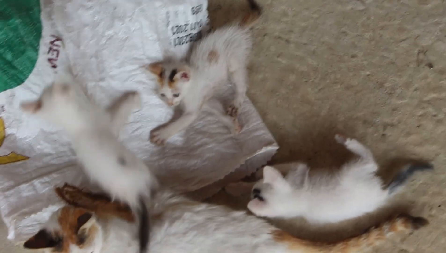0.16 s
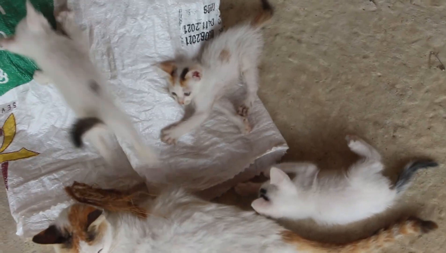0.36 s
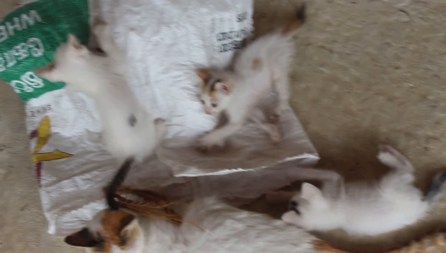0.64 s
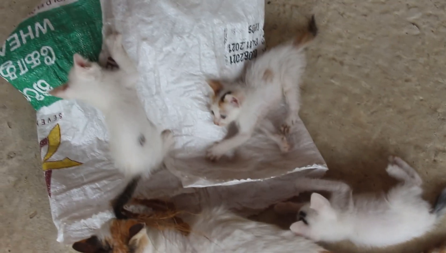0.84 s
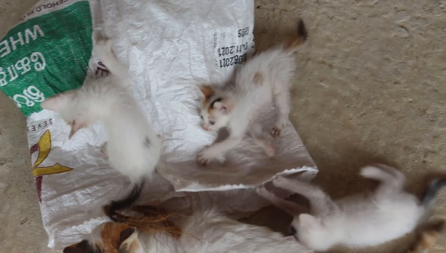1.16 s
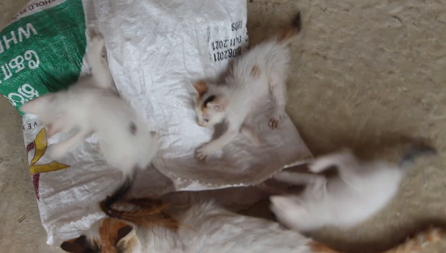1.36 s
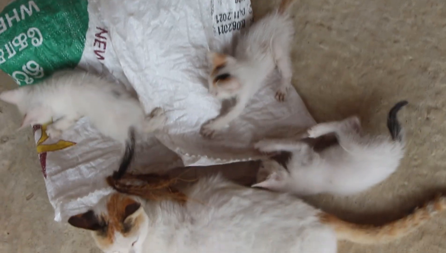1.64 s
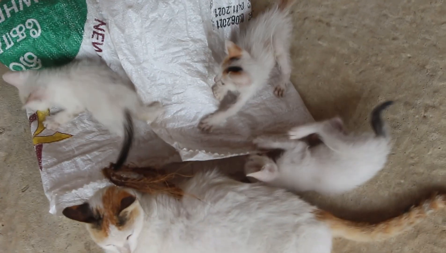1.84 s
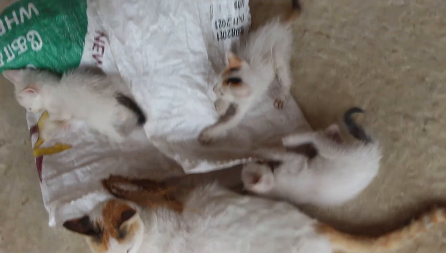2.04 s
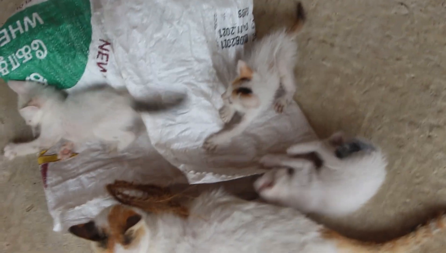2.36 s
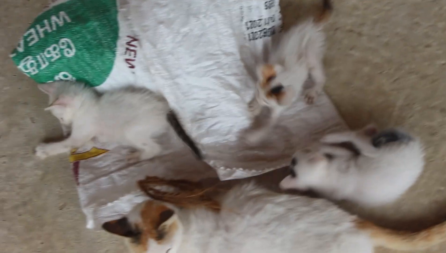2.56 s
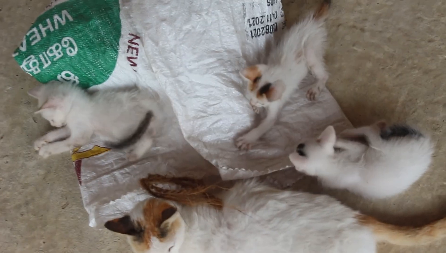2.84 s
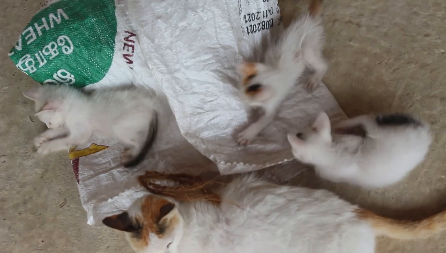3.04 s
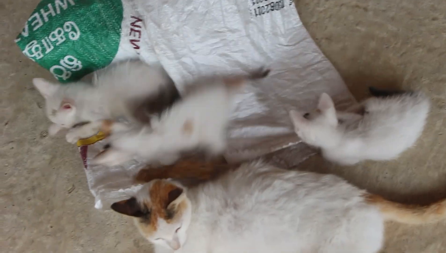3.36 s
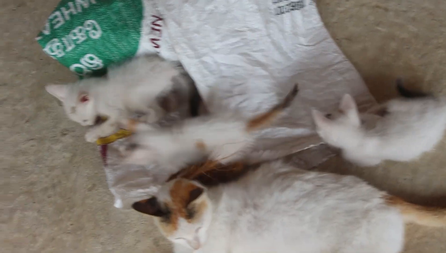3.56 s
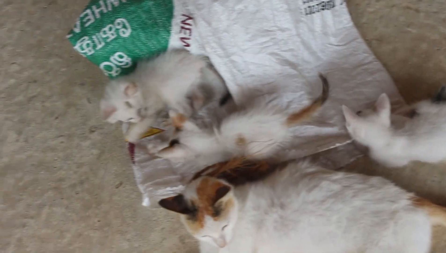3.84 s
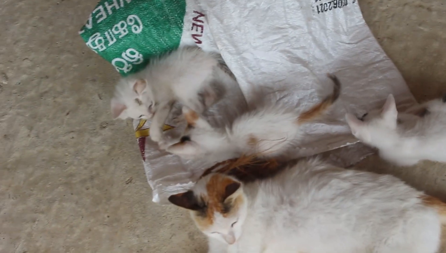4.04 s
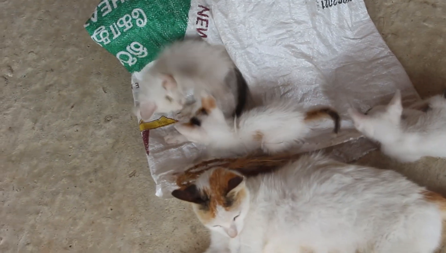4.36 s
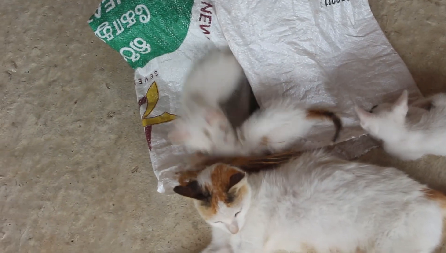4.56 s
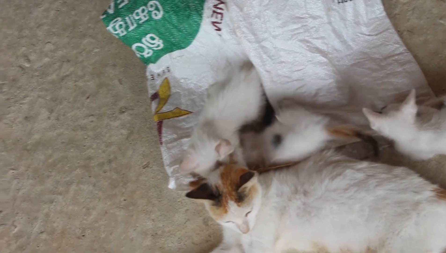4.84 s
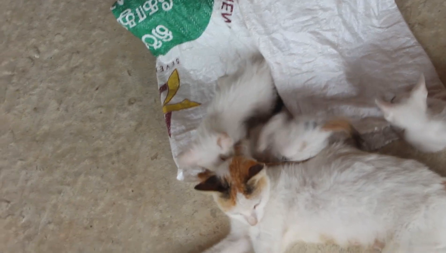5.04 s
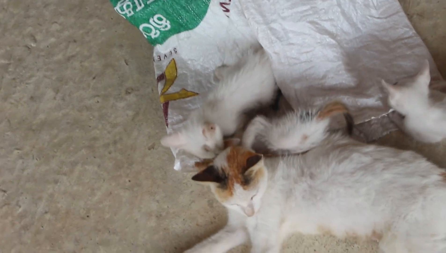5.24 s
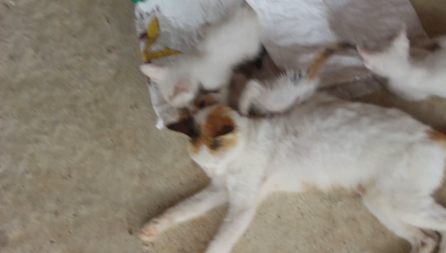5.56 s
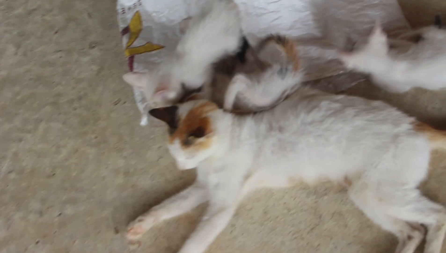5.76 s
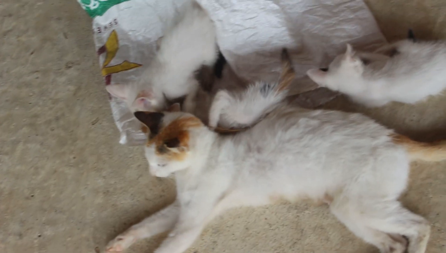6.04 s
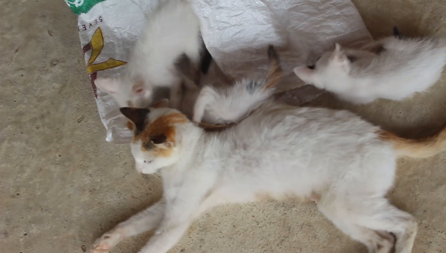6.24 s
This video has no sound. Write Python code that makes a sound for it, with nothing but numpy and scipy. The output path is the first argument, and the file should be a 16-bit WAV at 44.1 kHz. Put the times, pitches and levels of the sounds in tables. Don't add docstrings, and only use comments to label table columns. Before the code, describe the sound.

On a concrete porch, kittens wrestle on a woven plastic sack close to the microphone: bursts of dry rustling, claw ticks, hard snaps and soft body thumps. Two birds repeat hollow echoing calls from the yard, over faint shrill insects and a low outdoor wash. A frayed little mew comes at the very end.

```python
import sys
import numpy as np
from scipy import signal
from scipy.fft import rfft, irfft
from scipy.io import wavfile
from scipy.ndimage import uniform_filter1d

SR = 44100
rng = np.random.default_rng(int(sys.argv[2]) if len(sys.argv) > 2 else 0)


def transcribe(signal):
    frames = np.atleast_2d(signal).T
    limited = np.clip(frames, -1, 1)
    pcm = np.round(limited * 32767).astype(np.int16)
    wavfile.write(sys.argv[1], SR, pcm)


def gain_from_decibels(decibels):
    exponent = np.asarray(decibels, float) / 20
    return 10 ** exponent


N = 282240

# [f/Hz, level/dB per Hz]
WASH_SPECTRUM = [(18, -52), (30, -12), (165, -9), (210, -3.5), (345, -13.5), (616, -15), (889, -2),
                 (1040, -11.5), (1320, -13), (2120, -17), (5900, -28), (7090, -20), (8520, -27),
                 (9970, -33), (16000, -44)]
# [f/Hz, likeness 0..1]
WASH_LIKENESS = [(60, 0.19), (150, 0.26), (400, 0.035), (1000, 0.73), (2400, 0.057), (6000, 0.1),
                 (15000, 0.043)]
# [f/Hz, width/Hz, level/dB]
INSECT_BANDS = [
    (7007, 490, -59.5),
    (9800, 1100, -70.5),
]
# [f/Hz, t60/s]
PORCH_DECAY = [(200, 0.52), (1000, 0.23), (4000, 0.28), (12000, 0.19)]

# [t/s, rustle level/dB, fall/dB per s, weight over it/dB, crackle over it/dB]
LANDINGS = [(.006, -44.5, 482, -11, 0.5), (.308, -49, 420, 3, 3), (.366, -38, 160, 3.5, -12),
            (.565, -45.5, 53, -9, -3.5), (1.125, -49.5, 105, -20, -5), (1.358, -51, 40, 1.5, -3),
            (1.508, -45.5, 90, 3.5, -6), (1.658, -39, 470, -7.5, -19), (1.986, -49, 94, 3, 0),
            (2.645, -44, 225, -8, -3), (2.661, -50, 49, -5, -8), (4.366, -44, 125, -17, 0),
            (4.501, -39.5, 141, -16, -12), (4.78, -43, 204, -6, -7), (5.227, -53, 330, -4, -8),
            (5.358, -59, 800, -24, -19), (5.97, -53, 58, -12, -12)]
# [peak t/s, rustle level/dB, slope/dB per s,
# weight over it/dB, crackle over it/dB]
SLIDING = [(.18, -47.5, 107, -6, -6), (.258, -47.5, 150, -3, -18), (.415, -41, 135, 3, 0.5),
           (0.471, -46, 150, 1, -6), (.715, -54.5, 117, 1, -11), (1.71, -64.5, 90, 7, -21),
           (1.876, -49, 132, 0, -3), (2.257, -52, 63, -15, -6), (2.48, -56.5, 11, 0.5, -12),
           (2.565, -53, 150, -6, 0), (2.815, -46, 130, -6, -9), (3.2, -49, 69, -4.5, -6),
           (3.29, -45, 200, -0.5, -7), (3.41, -45, 92, -4, -2), (3.465, -42.5, 203, -3.5, -7),
           (3.64, -44, 118, -10, 1), (3.755, -53, 150, -12, -2), (3.975, -52, 123, 0, -9),
           (4.25, -51.5, 220, -2, -6), (4.33, -48.5, 98, -3, -2.5), (4.535, -44.5, 160, 1, -7),
           (4.84, -52.5, 110, -20, -8), (5.094, -50.5, 190, -15, -7), (5.78, -60.5, 36, -8, -6),
           (5.88, -55, 300, -8, 0)]
# [f/Hz, level/dB per Hz]
WEAVE_SPECTRUM = [(150, -14), (300, -2), (600, 0), (1200, 0), (2500, -3), (5000, -6), (8000, -12),
                  (11000, -18), (16000, -27)]
FOLD_RINGS = [9150, 2690, 5740, 1260, 3730, 1800, 7350]
# [t/s, peak level/dB, ring f/Hz, thud over it/dB]
HARD_SNAPS = [(.2538, -34, 2410, -18), (.2939, -30, 6050, -10), (.2991, -16, 3600, -17),
              (.3729, -28, 2480, -11), (.4064, -31, 5370, -10), (.4164, -32, 3380, -10),
              (.4454, -34, 3530, -10), (.6449, -29, 5000, -10), (.6938, -29, 3500, -5),
              (1.3658, -35, 4500, -5), (1.4247, -33, 6750, -19), (1.5029, -28, 5500, -12),
              (1.649, -25, 2700, -23), (2.6378, -16, 2680, -26), (3.2161, -30, 2400, -21),
              (3.2768, -27, 3680, -22), (3.3463, -37, 2590, -10), (3.4002, -30, 3600, -22),
              (3.4594, -33, 4250, -15), (3.6361, -30, 2780, -23), (4.3679, -26, 2550, -28),
              (4.4942, -31, 2200, -20), (4.5424, -28, 4050, -21), (4.7711, -19, 2730, -23),
              (5.0878, -32, 3810, -22)]
# [t/s, peak level/dB, ring f/Hz]
SOFT_SNAPS = [(.0987, -38, 2590), (1.1243, -41, 2350), (1.1722, -36, 4000), (1.256, -37, 4500),
              (1.4511, -37, 2630), (1.731, -37, 3770), (1.8687, -36, 6830), (1.9859, -39, 3150),
              (2.1969, -37, 2650), (2.2712, -42, 3290), (2.357, -40, 3450), (2.5351, -41, 2770),
              (2.5694, -41, 6880), (2.6119, -36, 4000), (2.7791, -35, 2660), (2.8194, -38, 2680),
              (3.1053, -33, 5500), (3.5743, -39, 5580), (3.7673, -34, 6500), (4.2542, -36, 3080),
              (4.3395, -36, 2450), (4.6594, -41, 6500), (5.0434, -40, 3620), (5.1148, -35, 2970),
              (5.2269, -38, 2610), (5.3577, -36, 2560), (5.7054, -44, 3920)]
# [delay t/s, level/dB]
FLOOR_ECHOES = [(.0028, -9), (.008, -14), (.0108, -10)]

# [middle note t/s, peak level/dB, f/Hz, first note before it t/s, last note after it t/s]
NEAR_CALLS = [(.153, -27, 893, 0.082, .062), (.82, -27.5, 885.4, 0.09, 0.061),
              (1.483, -27, 885, .083, 0.072), (2.165, -28.5, 896, 0.079, 0.074),
              (2.878, -29, 906.4, 0.092, .065), (3.597, -30.5, 886.6, 0.083, .067),
              (4.296, -31, 899, 0.092, .065), (5.0, -31, 895, 0.08, 0.066), (5.717, -31, 893.6, .082, 0.06),
              (6.427, -34, 902, 0.079, 0.084)]
# [t before it/s, level against it/dB, share of its f]
NEAR_PURR = [(.255, -21, .98), (.22, -20, .97), (.19, -20, .99), (.155, -17, .98), (.125, -16, .99),
             (.045, -15, .93)]
# [delay t/s, left level/dB, right level/dB]
NEAR_ECHOES = [(.013, -21, -3), (.037, -14, -9), (0.061, -3.5, -1.5), (.095, -12.5, -8)]
# [centre t/s, peak level/dB, f/Hz]
HIGH_NOTES = [(0.193, -34.5, 1304), (0.864, -36.5, 1295), (1.529, -39.5, 1333), (2.148, -37, 1316),
              (2.797, -37, 1310), (3.423, -36.5, 1304), (4.037, -36.5, 1307), (4.657, -38, 1323),
              (5.293, -36, 1319), (5.929, -39.5, 1308)]
# [t before it/s, level against it/dB, share of its f]
RISING_ROLL = [(.078, -8, .71), (.06, -7, .72), (.043, -8, .74), (.033, -12, .82), (.022, -12, .9)]
# [delay t/s, left level/dB, right level/dB]
FAR_ECHOES = [(0.021, -6, -5), (.052, -1.5, -5.5), (0.076, -8.5, -12.5), (0.199, -19, -20)]
# [t/s, peak level/dB, f/Hz, length t/s]
SMALL_CHIRPS = [
    (1.19, -53, 2696, .015),
    (1.214, -52.5, 2640, .015),
    (1.242, -52, 2710, .015),
    (1.285, -56, 2680, .015),
    (1.733, -44.5, 3660, 0.0071),
    (5.704, -50.5, 4050, 0.016),
    (5.707, -49, 4720, 0.0067),
    (5.73, -61, 4600, .02),
]

# [t/s, f/Hz, effort level/dB, mouth opening as a factor on its resonances]
MEW_COURSE = [
    (5.991, 831, -52.5, 1.1),
    (6.031, 863, -44.5, .92),
    (6.071, 1010, -43, .98),
    (6.14, 1150, -39, 1.15),
    (6.201, 982, -39.5, 1.01),
    (6.25, 874, -40.5, .81),
    (6.301, 812, -45, .95),
    (6.349, 764, -49, .88),
    (6.4, 719, -47, .8),
]
# [f/Hz, width/Hz, level/dB]
MOUTH_RESONANCES = [(2000, 2560, 6.5), (4200, 1430, 11.5), (5320, 1100, 5.5), (6470, 550, 2)]


def evened(x):
    return x / np.sqrt(np.mean(x ** 2) + 1e-20)


def read(points, hz):
    f, value = np.transpose(points)
    return np.interp(np.log(hz + 1), np.log(f + 1), value)


def add(mix, s, sound):
    part = mix[..., max(round(s * SR), 0):][..., :sound.shape[-1]]
    part += sound[..., :part.shape[-1]]


def band(x, lo_hz, hi_hz):
    edges = [lo_hz, min(hi_hz, SR / 2.1)]
    return signal.sosfilt(signal.butter(2, edges, "bandpass", fs=SR, output="sos"), x)


def resonate(x, hz, width):
    turn = np.exp(2j * np.pi * np.cumsum(hz * np.ones(x.shape[-1])) / SR)
    r = np.exp(-np.pi * width / SR)
    return 2 * (turn * signal.lfilter([1 - r], [1, -r], x / turn)).real


def coloured(x, points):
    return irfft(rfft(x) * gain_from_decibels(read(points, np.fft.rfftfreq(N, 1 / SR))), N)


def space(x, decays, gap_s, same):
    a, b = rng.standard_normal((2, SR))
    same = np.clip(same, 0, 1)
    ears = [a, same * a + np.sqrt(1 - same ** 2) * b]
    hz, t, z = signal.stft(ears, SR, nperseg=256)
    t60 = np.maximum(read(decays, hz), .03)[:, None]
    tail = signal.istft(z * gain_from_decibels(-60 * t / t60), SR, nperseg=256)[1]
    tail *= np.clip(np.arange(tail.shape[1]) / SR / gap_s, 0, 1)
    return signal.fftconvolve(np.atleast_2d(x), tail / np.linalg.norm(tail[0]), axes=1)[:, :N]


def outdoors():
    frames, hz = N // 256 + 5, np.fft.rfftfreq(1024, 1 / SR)
    a, b, c, d, patches = rng.standard_normal((frames, 513, 5)).T
    patches = uniform_filter1d(patches, 12, 0, mode="wrap")
    patches = evened(uniform_filter1d(patches, 14, 1, mode="wrap"))
    same = np.clip(read(WASH_LIKENESS, hz), -1, 1)[:, None]
    left = a + 1j * b
    right = same * left + np.sqrt(1 - same ** 2) * (c + 1j * d)
    z = np.array([left, right]) * gain_from_decibels(read(WASH_SPECTRUM, hz)[:, None] + 1.5 * patches)
    out = gain_from_decibels(-49) * evened(signal.istft(z, nperseg=1024, noverlap=768)[1][:, :N])
    for f, width, db in INSECT_BANDS:
        throb = gain_from_decibels(1.1 * evened(uniform_filter1d(rng.standard_normal(N), 900)))
        shrill = resonate(resonate(rng.standard_normal((2, N)), f, width), f, width)
        out += gain_from_decibels(db) * throb * evened(shrill)
    return out


def paws():
    landing_rise = 4000
    t, power = np.arange(0, N + 64, 64) / SR, 1e-12
    moves = [(landing_rise, *row) for row in LANDINGS] + [(row[2], *row) for row in SLIDING]
    for rise, s, db, fall, weight_db, crackle_db in moves:
        swell_db = db - np.where(t < s, rise * (s - t), abs(fall) * (t - s))
        power = power + gain_from_decibels(2 * (swell_db + np.array([[0], [weight_db], [crackle_db]])))
    return [np.interp(np.arange(N) / SR, t, p ** .5) for p in power]


def rustle():
    slips_per_s, fold_width, click_db = 4500, .3, -8
    clump = gain_from_decibels(2 * evened(uniform_filter1d(rng.standard_normal(N), 250)))
    sizes = gain_from_decibels(4 * np.minimum(rng.exponential(1, N), 3.5))
    slips = sizes * (rng.random(N) < slips_per_s / SR) * rng.choice([-1, 1], N)
    place = rng.integers(-3, 4, N)
    folds = np.zeros((2, N))
    for k, hz in zip(range(-3, 4), FOLD_RINGS):
        here = slips * (place == k)
        pair = np.array([here, np.roll(here, k)])
        folds += gain_from_decibels(click_db) * pair + resonate(pair, hz, hz * fold_width)
    folds = coloured(clump * folds, WEAVE_SPECTRUM)
    weave = evened(band(folds, 930, 7870))
    fine = evened(band(folds, 5200, 15000))
    weight = evened(band(folds, 125, 753))
    rub, press, crackle = paws()
    return (1.386 * rub * weave + crackle * fine + 0.71 * press * weight) * gain_from_decibels(-1.0)


def snaps():
    tick_thud_db = -20.5
    start_s = .0014
    out, u = np.zeros((2, N)), np.arange(1500) / SR
    tick = np.zeros(1500)
    add(tick, start_s, np.array([.6, 1., .3, -1., -1.5, -.6, .4]))
    rows = HARD_SNAPS + [(*row, tick_thud_db) for row in SOFT_SNAPS]
    for (s, db, hz, thud_db), grit in zip(rows, rng.standard_normal((len(rows), 1500))):
        pan_db = .7 * grit[0]
        treble_db = -10 - .45 * (db + 34) + 5 * np.log2(hz / 3000)
        grit = grit * (u > start_s)
        hit = tick + .1 * grit * np.exp(-u / .006)
        thud = tick + grit * np.exp(-u / .005)
        parts = [
            (-3.5, band(band(hit, 700, hz * 1.9), 500, hz * 2.2)),
            (-9, resonate(hit, hz, 800)),
            (treble_db, band(np.gradient(hit), 7500, 16500)),
            (thud_db + 3, band(band(thud, 230, 900), 180, 1100)),
            (-11, band(grit * np.exp(-u / .003), 900, 3200))]
        snap = sum(gain_from_decibels(d) * p / abs(p).max() for d, p in parts)
        pair = gain_from_decibels(db) * snap * gain_from_decibels(np.array([[pan_db], [-pan_db]]) / 2)
        for delay, echo_db in [(0.00034, 0.051)] + FLOOR_ECHOES:
            add(out, s + delay, gain_from_decibels(echo_db) * pair)
    return out


def sack():
    slide, crack = rustle(), snaps()
    sent = (gain_from_decibels(-6.0) * slide + gain_from_decibels(-6.5) * crack).mean(0)
    return slide + crack + space(sent, PORCH_DECAY, 0.0012, same=0.55)


def note(mix, s, db, hz, length_s, sag, second_db):
    u = np.arange(round(length_s * SR)) / (length_s * SR)
    turn = 2 * np.pi * np.cumsum(hz * (1 + sag * (.5 - u))) / SR
    tone = np.sin(turn) + gain_from_decibels(second_db) * np.sin(2 * turn)
    if s > length_s / 2:
        add(mix, s - length_s / 2, gain_from_decibels(db) * np.sin(np.pi * u) ** 2 * tone)


def yard(x, pan_db, echoes, wet_db, t60):
    out = x * gain_from_decibels(np.array([[pan_db], [-pan_db]]) / 2)
    for s, left_db, right_db in echoes:
        add(out, s, x * gain_from_decibels(np.array([[left_db], [right_db]])))
    return out + gain_from_decibels(wet_db) * space(x, [(100, t60), (9000, t60)], 0.0058, same=0.61)


def near_bird():
    x = np.zeros(N)
    for s, db, hz, before_s, after_s in NEAR_CALLS:
        for at, over_db, share in (-before_s, -7, 0.97), (0, 0, 1), (after_s, -1, 1.002):
            length_s = .046 + .25 * max(-at, 0)
            note(x, s + at, db + over_db, hz * share * 1.003, length_s, sag=.19, second_db=-24)
        for before, below_db, share in NEAR_PURR:
            note(x, s - before, db + below_db, hz * share, length_s=.035, sag=.15, second_db=-26)
    return yard(x, -5.5, NEAR_ECHOES, wet_db=1.0, t60=0.6)


def far_bird():
    x = np.zeros(N)
    for s, db, hz in HIGH_NOTES:
        note(x, s + 0.00102, db, hz, length_s=.05, sag=0.05, second_db=-30)
        for before, below_db, share in RISING_ROLL:
            note(x, s - before, db + below_db, hz * share, length_s=.026, sag=-0.11, second_db=-39)
    return yard(x, -2.7, FAR_ECHOES, wet_db=-4.0, t60=1.8)


def small_birds():
    x = np.zeros(N)
    for s, db, hz, length_s in SMALL_CHIRPS:
        note(x, s, db, hz, length_s, sag=0.06, second_db=-45)
    return x + gain_from_decibels(-0.5) * space(x, PORCH_DECAY, 0.0087, same=0.52)


def mew():
    s, *columns = np.transpose(MEW_COURSE)
    t = np.arange(N) / SR
    hz, effort_db, mouth = (uniform_filter1d(np.interp(t, s, c), 500) for c in columns)
    rough = np.clip(.38 + .022 * (-39 - effort_db), 0, 1)
    chest_db = uniform_filter1d(np.where(t < 6.05, -62, -47.5 + 9 * (t - 6.2)), 1500)
    wobble, *flutter = (evened(uniform_filter1d(v, 160)) for v in rng.standard_normal((10, N)))
    turns = np.cumsum(hz * (1 + .04 * rough * wobble)) / SR
    harmonics = (np.cos(2 * np.pi * k * turns) * gain_from_decibels(7 * rough * flutter[k - 1]) for k in range(2, 10))
    folds = evened(sum(harmonics))
    breath = 1.2 * rough * (.4 + np.exp(-(turns % 1) / .3)) * rng.standard_normal(N)
    drive = folds + breath
    cry = np.zeros(N)
    for k, (f, width, db) in enumerate(MOUTH_RESONANCES):
        formant = resonate(resonate(drive, f * mouth, width), f * mouth, width)
        cry += (-1) ** k * gain_from_decibels(db) * formant
    chest = np.sqrt(2) * np.cos(2 * np.pi * turns) * gain_from_decibels(chest_db + 8 * rough * flutter[0])
    onset = np.clip((t - s[0]) / 0.0087, 0, 1)
    voice = (gain_from_decibels(effort_db + 0.5) * evened(cry) + chest) * onset
    return voice + gain_from_decibels(-1) * space(voice, PORCH_DECAY, .004, same=.5)


def scene():
    return outdoors() + sack() + near_bird() + far_bird() + small_birds() + mew()


def band_limit(x):
    return signal.sosfilt(signal.butter(12, 15900, fs=SR, output="sos"), x)


def record(dry):
    cut = signal.sosfilt(signal.butter(2, 48, "highpass", fs=SR, output="sos"), dry)
    return band_limit(cut)


dry = scene()
out = record(dry)
transcribe(out)
```